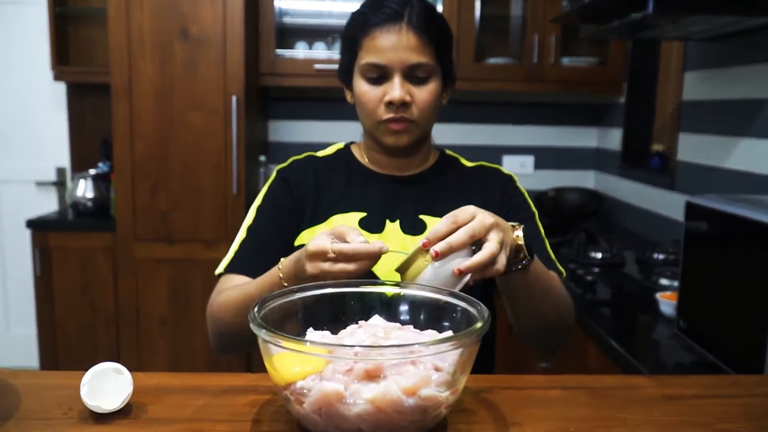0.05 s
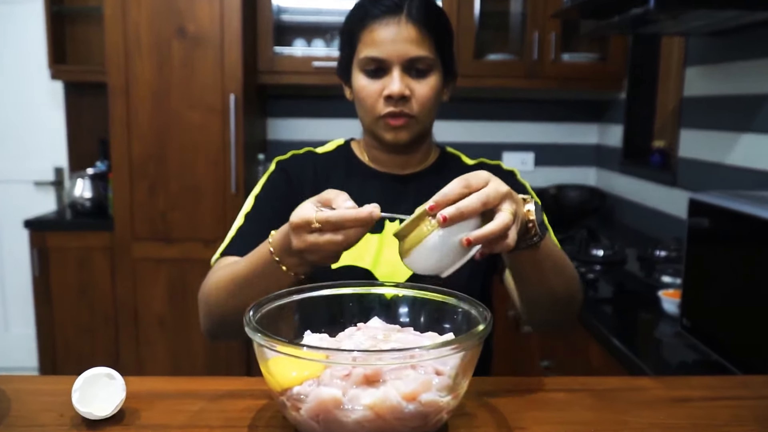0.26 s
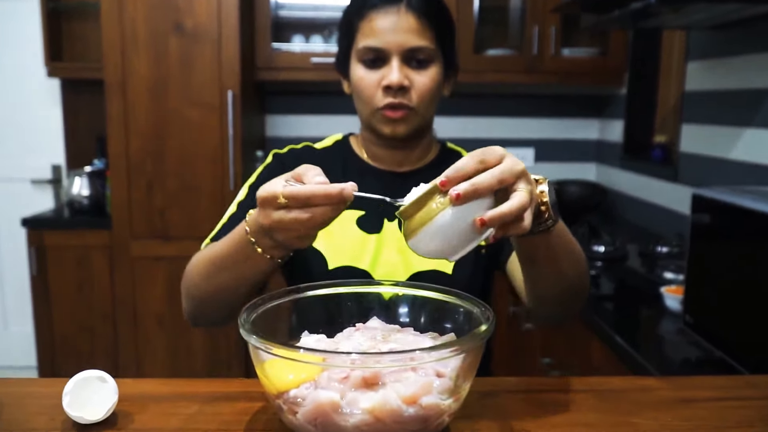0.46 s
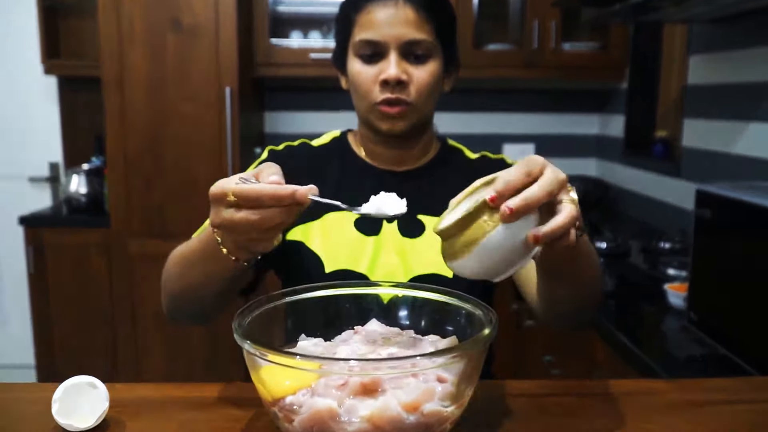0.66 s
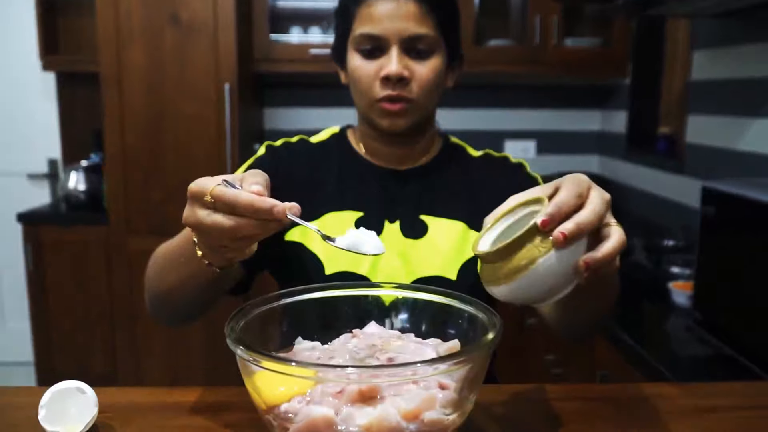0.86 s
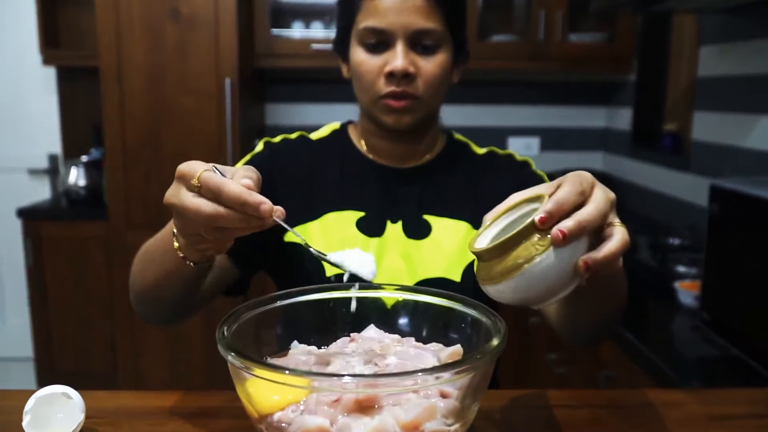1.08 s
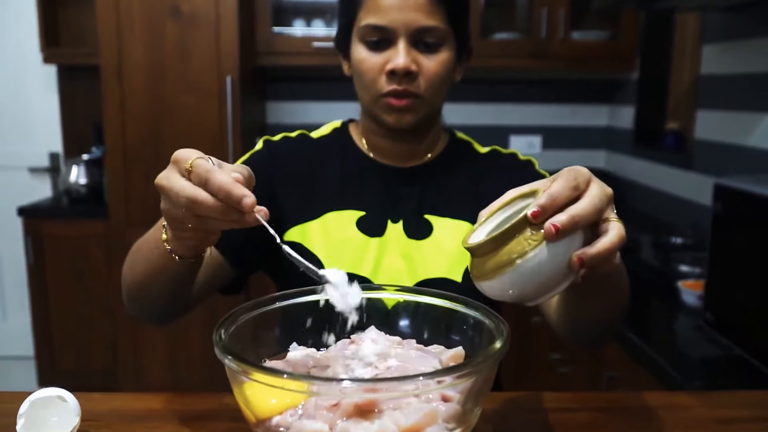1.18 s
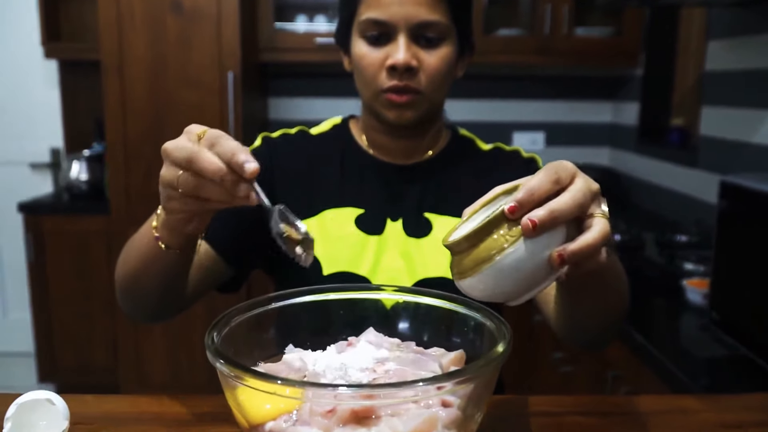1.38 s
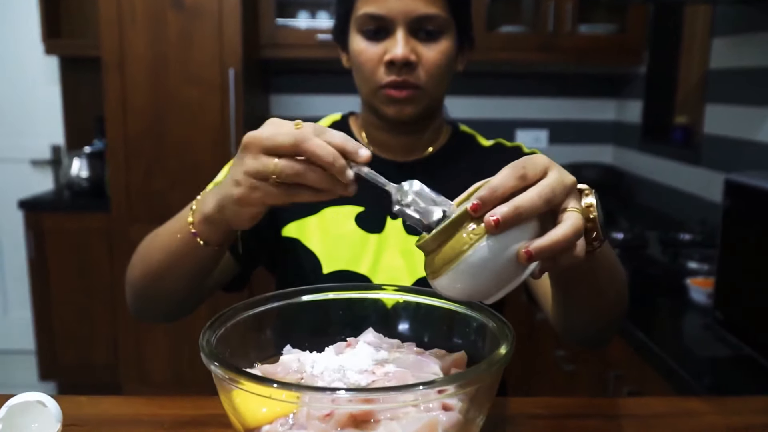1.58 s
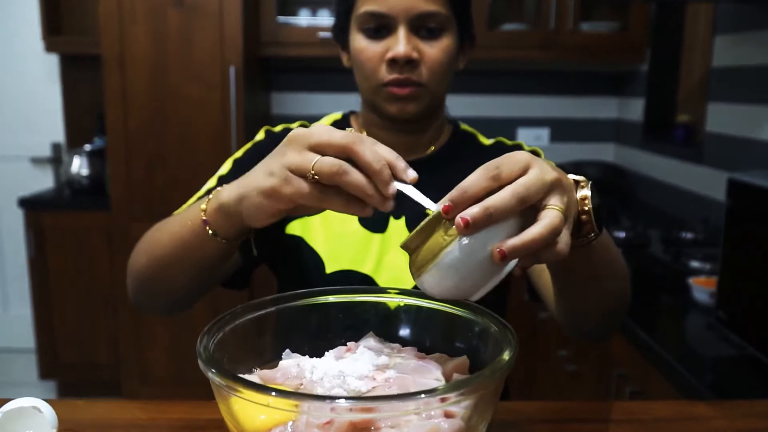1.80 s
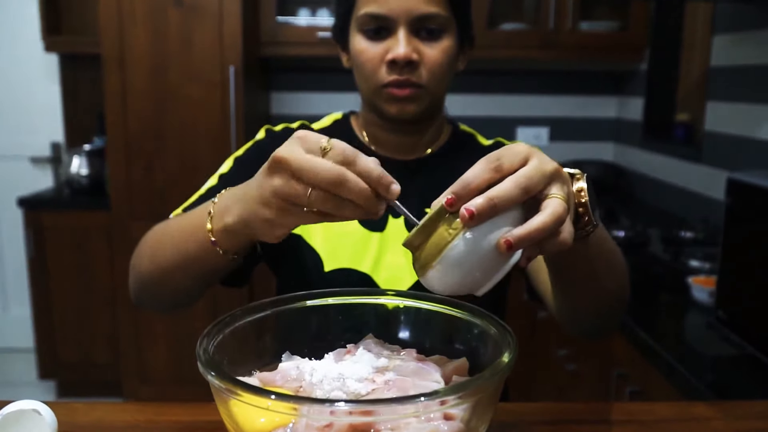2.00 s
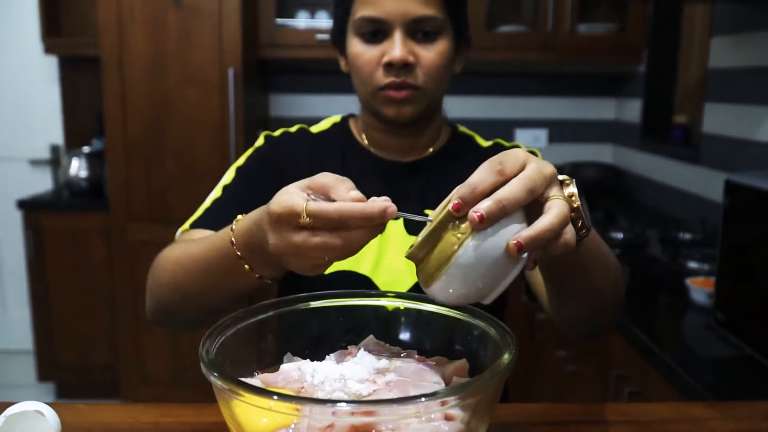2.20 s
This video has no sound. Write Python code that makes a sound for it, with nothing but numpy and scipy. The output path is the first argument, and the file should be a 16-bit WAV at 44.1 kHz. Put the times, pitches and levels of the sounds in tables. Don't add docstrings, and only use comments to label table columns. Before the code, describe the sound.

A metal spoon gives a last faint scrape in salt, a sharp counter knock sets glass ringing, a quiet gap with tiny ticks follows, then the spoon clinks and digs in a ceramic jar; close stereo, live kitchen.

```python
import sys
import numpy as np
from scipy import signal
from scipy.io import wavfile

SR = 44100
rng = np.random.default_rng(int(sys.argv[2]) if len(sys.argv) > 2 else 0)


def level_to_linear(level):
    exponent = np.asarray(level, float) / 20
    return 10 ** exponent


def to_wav(s):
    ch = np.atleast_2d(s).T
    pcm = np.round(np.clip(ch, -1, 1) * 32767)
    wavfile.write(sys.argv[1], SR, pcm.astype(np.int16))


N = 99225

# mode_hz, level_db, t60_s
JAR_LOW_MODES = [(856, -10.5, 0.059), (1042, 4, 0.016), (1690, 0, 0.0071), (2660, 13, 0.0013),
                 (3143, -8.5, 0.025), (4540, -20, 0.0049)]
# mode_hz, level_db, t60_s
JAR_HIGH_MODES = [(5090, -18, .03), (5200, -9, .06), (5265, -8.5, .09), (5375, -9.5, .07)]


def at_hz(points, hz):
    table_hz, value = np.transpose(points)
    return np.interp(np.log(hz), np.log(table_hz), value)


def rms_one(x):
    return x / np.sqrt(np.mean(x ** 2) + 1e-20)


def low_pass(x, hz):
    return signal.sosfilt(signal.butter(2, hz, fs=SR, output="sos"), x)


def high_pass(x, hz):
    return signal.sosfilt(signal.butter(3, hz, "high", fs=SR, output="sos"), x)


def band_pass(x, low_hz, high_hz, order):
    return signal.sosfilt(signal.butter(order, [low_hz, high_hz], "band", fs=SR, output="sos"), x)


def ring(clicks, hz, t60):
    radius = level_to_linear(-60 / (t60 * SR))
    angle = 2 * np.pi * hz / SR
    return signal.lfilter([0, np.sin(angle)], [1, -2 * radius * np.cos(angle), radius ** 2], clicks + 1e-18)


def train(s, db):
    out = np.zeros(N)
    np.add.at(out, (np.asarray(s) * SR).astype(int), level_to_linear(db))
    return out


def left_right(db):
    return level_to_linear(db * np.array([[.5], [-.5]]))


def noise_bands(size, likeness, gain):
    out = 0
    edges = 35 * 2 ** np.arange(0, 9.1, .5)
    white = rng.standard_normal((2, 2, size))
    for k, (low, high) in enumerate(zip(edges, edges[1:])):
        mid, side = band_pass(white[k % 2], low, high, order=2)
        hz = np.sqrt(low * high)
        alike = np.clip(at_hz(likeness, hz), 0, 1)
        stereo = np.sqrt(1 + alike) * mid + np.sqrt(1 - alike) * side * [[1], [-1]]
        out = out + gain(hz) * stereo
    return out


def knocked_glass(ring_db, counter_db, snap_db):
    # start_s, peak_db
    blows = [
        (0.2151, -41.5),
        (0.2168, -7.5),
        (0.2202, -20),
        (0.232, -32.5),
    ]
    # mode_hz, then level_db, t60_s
    mode_hz = [222, 295, 487, 625, 842, 1290, 1674, 3004, 4691, 5340, 6692, 9006, 11560, 14390]
    mode_decay = [(-16, 0.043), (-26, 0.15), (-17, 0.03), (-22, .06), (-21, 0.03), (-17, 0.02),
                  (-12.5, 0.34), (-18, 0.42), (-21, 0.3), (-28, .15), (-33, .3), (-35, .2), (-38, .1),
                  (-43, .09)]
    # twin_hz, sign, then level_db, t60_s
    twin_hz = [1660, 2987, 4708, 6674]
    twin_sign = [-1, 1, 1, 1]
    twin_decay = [(-17, .33), (-23, .42), (-24, .3), (-37, .3)]

    s, peak_db = np.transpose(blows)
    rebounds = low_pass(train(s[2:], peak_db[2:]), 2900)
    clicks = train(s[:2], peak_db[:2]) + rebounds

    thud = level_to_linear(-14) * ring(clicks, hz=830, t60=0.00092)
    snap = level_to_linear(6 + snap_db) * ring(clicks, hz=2140, t60=0.00094)
    twins = 0
    for hz, sign, (db, t60) in zip(twin_hz, twin_sign, twin_decay):
        twins = twins + sign * level_to_linear(db + ring_db) * ring(clicks, hz, t60)
    modes = 0
    for k, (hz, (db, t60)) in enumerate(zip(mode_hz, mode_decay)):
        extra_db = ring_db if hz > 1500 else counter_db
        modes = modes + (-1) ** k * level_to_linear(db + extra_db) * ring(clicks, hz, t60)
    return thud + snap + left_right(-9.5) * twins + modes


def spoon_clinks():
    # start_s, peak_db, low_modes_db, top_modes_db
    touches = [(.0080, -41, -15.5, -6), (.0300, -42.5, -29, 8), (1.8195, -19, -14.5, -9),
               (1.894, -39, -0.5, -10), (1.898, -28.5, -12, -16), (1.9069, -27, -26, 2),
               (1.9130, -32, -4, 7), (1.9175, -42.5, 5, -15), (1.9215, -46.5, 2, -13),
               (1.9282, -25, -10.5, 1), (1.9400, -27.5, -8, 3), (1.9481, -17.5, -20.5, 5.5),
               (1.9560, -41, -0.5, -15), (1.9770, -44.5, -1, -13), (2.0120, -47.5, 4.5, -12),
               (2.0840, -52.5, 8, -16), (2.1100, -73, 18, -10), (2.1180, -62, 15, -10),
               (2.233, -38.5, -19, -22), (2.2420, -39.5, -4.5, 15)]
    # mode_hz, level_db, t60_s
    top_modes = [(8000, -22, .003), (11600, -20, .004), (13320, -21, .03), (15600, -29, .03)]
    s, peak_db, low_db, top_db = np.transpose(touches)
    luck_db = 2 * rng.standard_normal((30, 14))[:len(s)]

    def strike(modes, extra_db, first):
        body = 0
        for k, (hz, mode_db, t60) in enumerate(modes, first):
            body = body + ring(train(s, peak_db + extra_db + mode_db + luck_db[:, k]), hz, t60)
        return body

    low_count, high_count = len(JAR_LOW_MODES), len(JAR_HIGH_MODES)
    low = low_pass(strike(JAR_LOW_MODES, low_db, first=0), 6000)
    bowl = band_pass(strike(JAR_HIGH_MODES, 0, first=low_count), 4580, 5900, order=1)
    top = strike(top_modes, top_db, first=low_count + high_count)
    crack = ring(train(s, peak_db + top_db - 15), hz=9000, t60=.0008)
    return low + bowl + top + crack


def salt_grind():
    # time_s, level_db
    strokes = [
        [(0, -44.5), (0.039, -51), (0.109, -80), (.16, -70)],
        [(1.88, -56), (1.895, -44.5), (1.959, -49), (2.02, -72), (2.08, -83), (2.13, -43), (2.191, -71),
         (2.25, -40)],
    ]
    grains_per_s = 1500
    snaps = rng.random(N) < grains_per_s / SR
    size_db = 3 * np.minimum(rng.exponential(1, N), 4)
    grains = snaps * level_to_linear(size_db) * rng.choice([-1, 1], N)

    t = np.arange(N) / SR
    push = 0
    for stroke in strokes:
        time_s, level_db = np.transpose(stroke)
        push = push + level_to_linear(np.interp(t, time_s, level_db, left=-200, right=-200) - 25)
    grains = rms_one(grains) * push

    spray = level_to_linear(-1) * high_pass(grains, 6000)
    grains = low_pass(grains, 5600)
    low = sum(level_to_linear(db) * ring(grains, hz, t60) for hz, db, t60 in JAR_LOW_MODES)
    high = sum(level_to_linear(db) * ring(grains, hz, t60) for hz, db, t60 in JAR_HIGH_MODES)
    rasp = ring(grains, hz=1800, t60=.0015)
    return spray + low + level_to_linear(-4) * high + level_to_linear(9) * rasp


def small_ticks(to_room):
    # start_s; pitch_hz; then peak_db, ring_cycles, room_share_db
    start_s = [.0050, .0290, .2495, .3780, .7450, .8630, 1.0628, 1.0660, 1.0690, 1.0692, 1.0693, 1.0695,
               1.8192, 1.8193, 1.8195, 1.8925, 1.9068, 1.9130, 1.9555, 2.2425, 1.8200, 1.8202, 1.8204,
               1.8206, 1.8196, 1.9770]
    pitch_hz = [300, 11000, 9300, 8300, 700, 1950, 6700, 3950, 4600, 1450, 10000, 6900, 4250, 3090, 2330,
                2100, 1900, 1900, 1800, 2600, 7900, 9900, 12780, 13750, 780, 1900]
    contacts = [(-56, 7.1, 22.5), (-56, 1700, -12), (-30, 62, 4.5), (-25, 12, 1), (-38, 7.2, -10.5),
                (-34, 6, -2.5), (-35.5, 26, 5), (-31.5, 11, 5), (-32, 15, 3), (-43, 15.5, 3),
                (-32.5, 10.4, 10), (-36, 22, 12), (-25.5, 39, 2.5), (-30.5, 120, -0.5), (-23.5, 15, 0),
                (-26.5, 7, 5.5), (-22.5, 6.2, 2.5), (-20.5, 4, -1), (-18.5, 7.7, -15), (-36, 46, -9),
                (-20, 23, -14), (-32, 40, 8), (-28, 66, 0), (-37, 74, -18), (-35.5, 10.6, -18),
                (-32, 5.9, -3)]
    out = 0
    for s, hz, (peak_db, cycles, room_db) in zip(start_s, pitch_hz, contacts):
        level_db = peak_db + to_room * (room_db - 1)
        tick = ring(train([s], [level_db]), hz, t60=cycles / hz)
        out = out + band_pass(tick, hz * .6, hz * 1.6, order=1)
    return out


def kitchen():
    # band_hz, t60_s
    decay = [(150, 0.91), (700, 0.75), (2000, 0.65), (5000, 0.93), (12000, 0.54)]
    # band_hz, level_db
    colour = [(150, -24), (700, 5), (2000, -2), (5000, -6.5), (12000, -11)]
    # band_hz, likeness_0_to_1
    room_likeness = [(150, 1), (700, 0.86), (2000, 0.76), (5000, 0.12), (12000, 0.44)]
    t = np.arange(SR) / SR
    tail = noise_bands(SR, room_likeness, lambda hz: level_to_linear(at_hz(colour, hz) - 60 * t / at_hz(decay, hz)))
    build_s = 0.0014
    tail = tail * np.clip(t / build_s - .5, 0, 1)
    return tail / np.sqrt(np.sum(tail ** 2) / 2)


def reverberate(x, room):
    return signal.fftconvolve(x, room, axes=1)[:, :N]


def background():
    # band_hz, level_db
    air_colour = [(40, -28), (220, -17), (330, -6), (700, 0), (1500, -6.5), (3000, -3), (8000, -6),
                  (16000, -11)]
    # band_hz, likeness_0_to_1
    air_likeness = [(60, .2), (200, 0.84), (1000, 1), (4000, 1), (12000, 0.37)]
    air = rms_one(noise_bands(N, air_likeness, lambda hz: level_to_linear(at_hz(air_colour, hz))))
    insect_hz, width_hz = 8200, 150
    t60 = np.log(1000) / np.pi / width_hz
    whistle = ring(rng.standard_normal((2, N)), insect_hz, t60)
    whistle = rms_one(ring(whistle, insect_hz, t60))
    return level_to_linear(-56) * air + level_to_linear(-71) * whistle


def scene():
    room = kitchen()
    jar = high_pass(spoon_clinks() + salt_grind(), 945)
    jar = jar + level_to_linear(-3) * reverberate(jar[None], room)
    jar = left_right(3) * jar

    knock = high_pass(knocked_glass(ring_db=0, counter_db=0, snap_db=0), 423)
    knock_to_room = level_to_linear(1.5) * knocked_glass(ring_db=-11, counter_db=-4.5, snap_db=-2)
    wet = reverberate(knock_to_room + small_ticks(True), room)
    return knock + jar + small_ticks(False) + wet + background()


def top_cut(x):
    return signal.sosfilt(signal.butter(12, 16480, fs=SR, output="sos"), x)


def record(dry):
    mix = signal.sosfilt(signal.butter(2, 120, "high", fs=SR, output="sos"), dry)
    mix = signal.sosfilt(signal.ellip(12, .5, 90, 15800, fs=SR, output="sos"), mix)
    return top_cut(mix)


dry = scene()
out = record(dry)
to_wav(out)
```